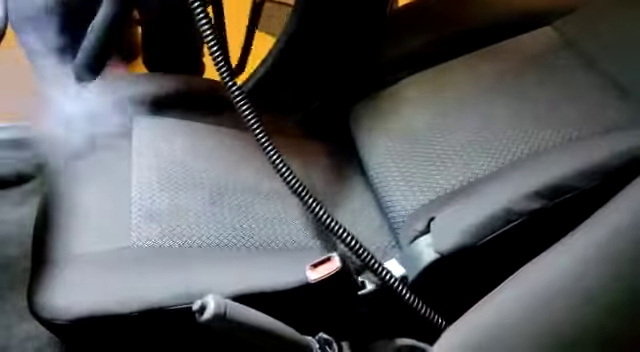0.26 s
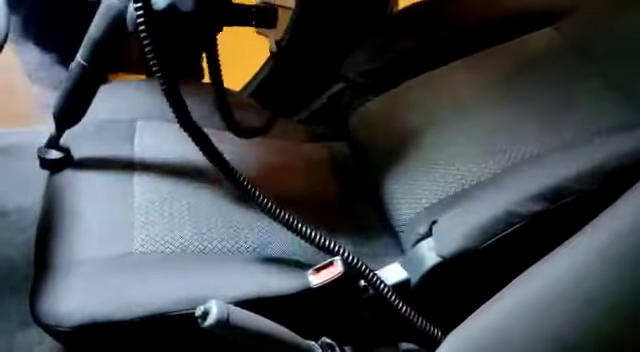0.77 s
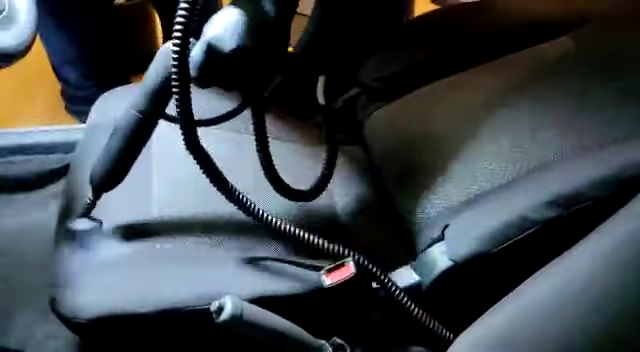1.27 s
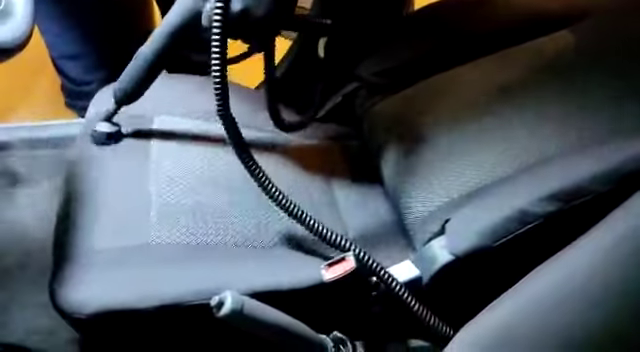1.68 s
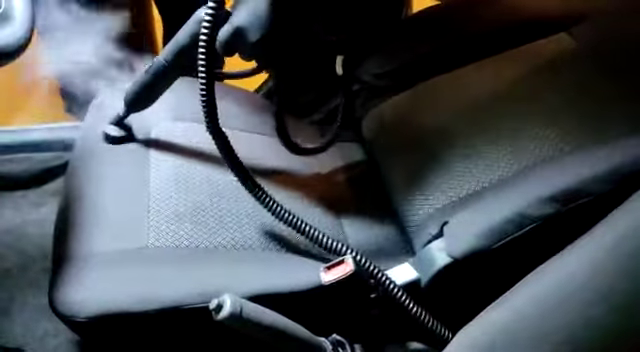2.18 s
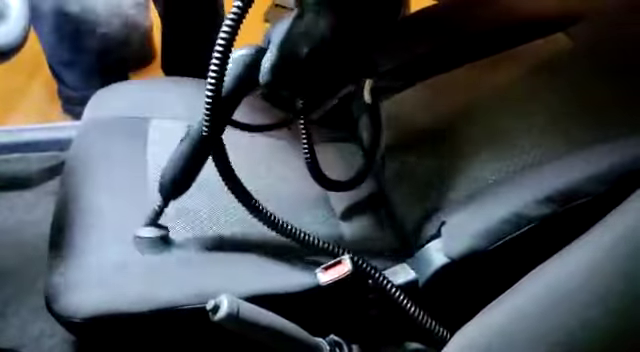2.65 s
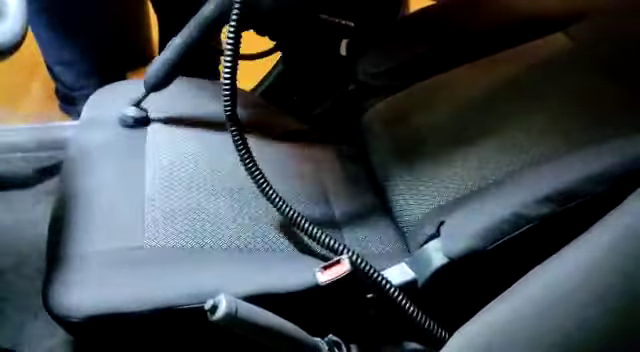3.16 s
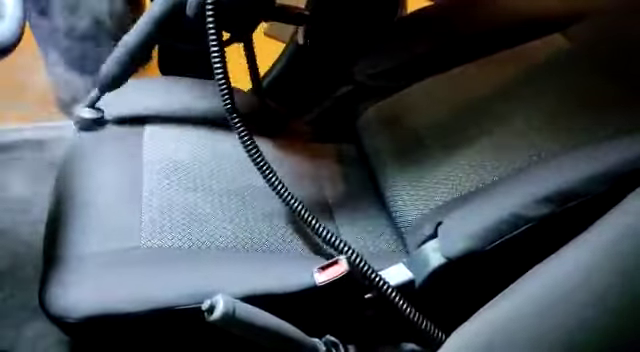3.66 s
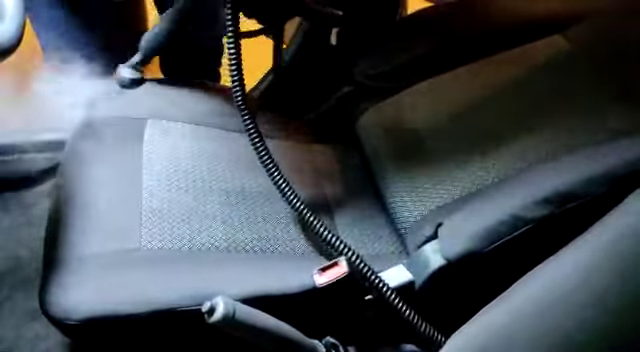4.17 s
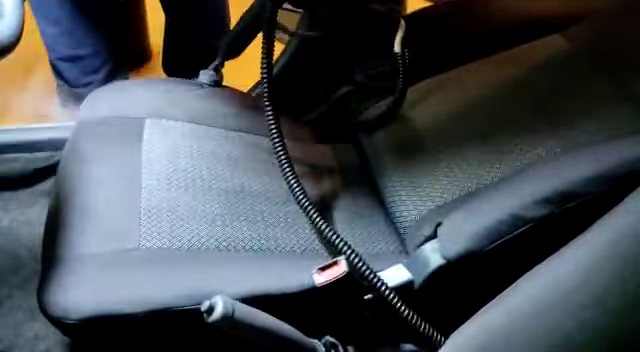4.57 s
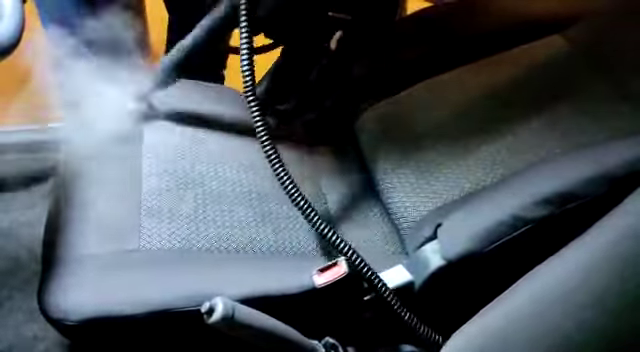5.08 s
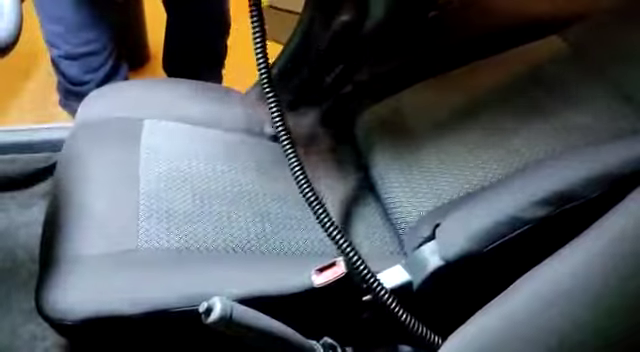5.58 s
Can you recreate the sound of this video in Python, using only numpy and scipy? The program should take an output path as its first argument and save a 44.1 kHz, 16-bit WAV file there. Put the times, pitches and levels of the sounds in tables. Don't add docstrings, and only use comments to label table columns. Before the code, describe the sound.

Steady, sizzling steam with a sharp high resonance, slightly different in pitch at left and right, fluctuates as the wand sweeps a seat. Irregular wind rumble and soft, blunt thuds overload the close phone microphone, heavier on the left. A very faint motor hum wavers beneath. Late on, one strong puff strikes the right, then the wand lifts and the hiss opens out.

```python
import sys
import numpy as np
from scipy import signal
from scipy.fft import rfft, irfft, next_fast_len
from scipy.io import wavfile
from scipy.ndimage import uniform_filter1d

SR = 44100
rng = np.random.default_rng(int(sys.argv[2]) if len(sys.argv) > 2 else 0)


def transcribe(u):
    v = np.clip(np.atleast_2d(u).T, -1, 1)
    q = np.round(v * 32767).astype(np.int16)
    wavfile.write(sys.argv[1], SR, q)


def to_linear_factor(level_db):
    exponent = np.asarray(level_db, float) / 20
    return 10 ** exponent


N = 257544


def unit_rms(x):
    return x / np.sqrt(np.mean(x ** 2))


def walk(rate_hz):
    hold = int(SR / rate_hz)
    steps = np.repeat(rng.standard_normal(N // hold + 1), hold)
    slewed = uniform_filter1d(uniform_filter1d(steps, hold), hold)
    return unit_rms(slewed[:N])


def butter(x, hz, kind, order):
    return signal.sosfilt(signal.butter(order, hz, kind, fs=SR, output="sos"), x)


# start_s, flow_db, aim_left_over_right_db, lift_db
WAND_SWEEP = [(0.0, 1.5, 4.5, 1.5), (0.15, 0.5, 1, 3.5), (0.6, -0.5, 2.5, 1), (1.05, 0, 4.5, 1.5),
              (1.41, 2.5, 3.5, 0), (1.9, 0, 2.5, 1), (2.2, -1, 1, 3), (2.6, 1, 5.5, 0), (2.85, 1.5, 4, 0),
              (3.4, 1.5, 1, 2.5), (3.8, 3, 2, 2), (4.1, -1, 2.5, 1.5), (4.5, -1, 1.5, 2),
              (4.83, 1.5, -2, 3.5), (5.06, -0.5, 4, 1), (5.4, 0, 0.5, 4.5), (5.7, -3, -3, 10),
              (5.84, 0.5, -2, 6.5)]
# centre_s, dip_left_db, dip_right_db, half_length_s
NOZZLE_DIPS = [(0.043, 1, 1.5, 0.024), (0.422, 3, 2, 0.077), (0.79, 1, 1.5, 0.07), (0.92, 2, -1, 0.21),
               (1.227, 3.5, -0.5, 0.055), (1.62, 5, 0.5, 0.13), (1.815, 3, 2, 0.045),
               (2.047, 1.5, 1.5, 0.045), (2.31, 4.5, 0.5, 0.055), (2.438, 4.5, -0.5, 0.056),
               (2.7, 2, 2, 0.031), (2.927, 4.5, 0, 0.071), (3.14, 3.5, 3.5, 0.14), (3.31, 2, 0, 0.046),
               (3.65, 5, 4, 0.12), (3.892, 7, 5, 0.028), (4.274, 1, 1, 0.027), (4.385, -0.5, 1.5, 0.051),
               (4.573, 0, 2, .025), (4.681, 5.5, 4, 0.08), (4.944, 4.5, 2.5, 0.043), (5.27, 5, 3, 0.077),
               (5.352, 4.5, -2, 0.032), (5.512, 1.5, 9, 0.087), (5.68, 1.5, 1, 0.035),
               (5.84, 4.5, 5, 0.038)]


def wand():
    t_s = np.arange(N) / SR
    start_s, *columns = np.transpose(WAND_SWEEP)
    flow_db, aim_db, lift_db = [np.interp(t_s, start_s, column) for column in columns]
    dip_l_db, dip_r_db = np.zeros((2, N))
    for centre_s, left_db, right_db, half_s in NOZZLE_DIPS:
        shape = np.exp(-((t_s - centre_s) / half_s) ** 2)
        dip_l_db += left_db * shape
        dip_r_db += right_db * shape
    ring_db = (flow_db + aim_db / 2 - dip_l_db, flow_db - aim_db / 2 - dip_r_db)
    hiss_db = (flow_db + lift_db - 1.1 * dip_l_db, flow_db + lift_db - 1.3 * dip_r_db)
    return ring_db, hiss_db


# corner_hz, left_db, right_db
PORT_COLOURS = [(278, -89, -92), (636, -73.5, -77.5), (1485, -72, -71.5), (2320, -64, -67.5),
                (2860, -60, -62), (3420, -62.5, -65), (5000, -58, -59.5), (6180, -59, -55.5),
                (7160, -54.5, -50), (7660, -51.5, -43.5), (8420, -49, -46.5), (8930, -44, -72),
                (9466, -55, -54), (10010, -63.5, -65.5), (15300, -69, -66.5)]
SHARED_PATHS = [(13, .4), (94, .42)]


def jet():
    ring_hz, air_hz, lowest_hz = 6000, 10300, 320
    ring_db, hiss_db = wand()
    both_db = ring_db[0] + ring_db[1]
    size = next_fast_len(N)
    hz = np.arange(1, size // 2 + 2) * SR / size
    corner_hz, *colours = np.transpose(PORT_COLOURS)
    wrap = np.arange(size) % N
    right = rng.standard_normal(size) * to_linear_factor(0.9 * walk(400)[wrap])
    left = rng.standard_normal(size) * to_linear_factor(0.9 * walk(400)[wrap])
    left = left + sum(share * np.roll(right, lag) for lag, share in SHARED_PATHS)
    out = []
    for noise, colour_db, ring, hiss in zip((left, right), colours, ring_db, hiss_db):
        colour = to_linear_factor(np.interp(np.log(hz), np.log(corner_hz), colour_db))
        spectrum = rfft(unit_rms(noise)) * colour * np.sqrt(SR / 2)
        air = 0.55 * (both_db - both_db.mean()) + 0.47 * (ring - ring.mean())
        port, near = 0, walk(3.5)
        for step in range(18):
            octave_thirds = 3 * np.log2(hz / lowest_hz) - step
            centre_hz = lowest_hz * 2 ** (step / 3)
            if centre_hz < ring_hz:
                drive_db = hiss - hiss.mean()
            elif centre_hz < air_hz:
                drive_db = ring - ring.mean()
            else:
                drive_db = air
            near = 0.5 * near + 0.85 * walk(11)
            window = np.cos(np.clip(octave_thirds, -1, 1) * np.pi / 2) ** 2
            band = irfft(spectrum * window, size)[:N]
            port = port + band * to_linear_factor(drive_db + 0.6 * near)
        out.append(port)
    return np.array(out)


def puffs(table, calm_db):
    fade_db = 19
    t_s, power = np.arange(N) / SR, to_linear_factor(calm_db) ** 2
    for peak_s, peak_db, rise_s, fall_s in table:
        distance = np.maximum((peak_s - t_s) / rise_s, (t_s - peak_s) / fall_s)
        power = power + to_linear_factor(peak_db - fade_db * distance) ** 2
    return 10 * np.log10(power)


def buffet(gusts, flaps, calm_db):
    cavity_hz, cavity_width_hz, edge_floor_db = 188, 131, -46
    buffet_db = puffs(gusts, calm_db)
    edge_db = np.maximum(puffs(flaps, -70), 0.12 * buffet_db - 39)
    flutter = to_linear_factor(4.5 * walk(50))
    flutter_rms = np.sqrt(uniform_filter1d(flutter ** 2, size=4000))
    eddies = rng.standard_normal(N) * flutter / flutter_rms

    band_hz = [cavity_hz - cavity_width_hz / 2, cavity_hz + cavity_width_hz / 2]
    cavity = unit_rms(butter(eddies, band_hz, "bandpass", order=1))
    cavity = unit_rms(butter(cavity, 314, "lowpass", order=3))
    cavity = unit_rms(butter(cavity, 104, "highpass", order=1))

    small = unit_rms(butter(eddies * to_linear_factor(1.5 * walk(25)), [240, 450], "bandpass", order=1))
    small = unit_rms(butter(small, 472, "lowpass", order=3))
    spit = unit_rms(butter(eddies * to_linear_factor(3.9 * walk(30)), [430, 850], "bandpass", order=2))
    small = small + to_linear_factor(-15) * spit

    rumble = butter(rng.standard_normal(N), 49, "lowpass", order=1)
    rumble = unit_rms(butter(rumble, 12, "highpass", order=1))
    rumble = butter(rumble, 203, "lowpass", order=2)
    rumble_db = 0.52 * buffet_db - 15.5 + 2.2 * walk(6.7)

    edge = butter(eddies, 260, "highpass", order=2)
    edge = unit_rms(butter(edge, 1000, "lowpass", order=2))
    edge_gain = np.sqrt(np.maximum(to_linear_factor(edge_db) ** 2 - to_linear_factor(edge_floor_db) ** 2, 0))
    return (cavity * to_linear_factor(buffet_db - 2.5) + small * to_linear_factor(1.49 * buffet_db - 1.5)
            + rumble * to_linear_factor(rumble_db) + edge * edge_gain * to_linear_factor(-5.5))


# peak_s, peak_db, rise_s, fall_s
GUSTS_LEFT = [(0.08, -13.5, 0.062, 0.23), (0.26, -16, 0.028, 0.1), (0.36, -16, 0.06, .12),
              (0.7, -12, 0.14, 0.093), (0.86, -11, 0.079, .1), (1.06, -12.5, 0.059, .18),
              (1.28, -13.5, 0.12, 0.15), (1.42, -12, 0.024, 0.17), (1.55, -7, 0.068, 0.089),
              (1.77, -11.5, 0.047, 0.019), (1.99, -18, 0.031, 0.092), (2.08, -12.5, 0.13, 0.1),
              (2.25, -10, .1, 0.036), (2.37, -13, 0.15, 0.12), (2.58, -22.5, .07, 0.073),
              (2.87, -11.5, 0.19, 0.096), (3.08, -20, 0.037, 0.031), (3.18, -9, 0.017, 0.03),
              (3.33, -9, 0.052, 0.07), (3.54, -19, .3, 0.065), (3.72, -19.5, 0.062, 0.12),
              (3.98, -14.5, 0.076, 0.027), (4.25, -20, 0.45, .06), (4.71, -12, 0.089, 0.14),
              (4.93, -11.5, 0.065, .12), (5.18, -15, 0.049, 0.032), (5.27, -7.5, 0.018, 0.047),
              (5.51, -12.5, 0.32, 0.12), (5.7, -28, .2, 0.21)]
GUSTS_RIGHT = [(0.1, -35, .3, .3), (0.24, -27, 0.13, 0.24), (0.36, -21.5, 0.22, 0.043),
               (0.49, -20.5, 0.043, 0.078), (0.72, -34, 0.18, .3), (0.9, -20, 0.17, 0.15),
               (1.2, -16.5, 0.063, 0.045), (1.39, -22, .25, 0.065), (1.58, -20, 0.15, 0.14),
               (1.75, -24, 0.059, 0.079), (1.91, -25, 0.054, 0.027), (2.13, -17, 0.062, 0.037),
               (2.23, -27, 0.12, 0.35), (2.49, -17.5, 0.12, 0.036), (2.63, -28, .045, 0.13),
               (2.78, -46, .1, .08), (2.91, -16, .09, 0.091), (3.13, -26, 0.059, 0.035),
               (3.29, -40, 0.06, .2), (3.4, -34, 0.13, .1), (3.48, -27, 0.067, 0.099),
               (3.63, -30, 0.21, 0.035), (3.86, -22.5, .08, .05), (4.02, -35, 0.22, 0.078),
               (4.63, -21, 0.12, 0.11), (4.96, -20, .08, 0.13), (5.1, -19, .12, 0.12),
               (5.45, -6, 0.04, 0.03), (5.59, -26, 0.093, 0.32)]
# peak_s, peak_db, rise_s, fall_s
EDGE_FLAPS_LEFT = [(0.08, -20, .06, .06), (0.14, -28, .05, .05), (0.36, -38, .07, .2), (0.7, -40, .08, .08),
                   (0.86, -27, 0.062, 0.044), (1.56, -24, .06, 0.079), (2.08, -24, 0.053, 0.055),
                   (2.3, -35, .15, .15), (4.93, -42, .06, .06), (0.55, -34, .2, 0.28),
                   (1.06, -25, 0.055, 0.51), (1.28, -21.5, 0.061, 0.33), (1.42, -15.5, 0.032, 0.095),
                   (1.93, -35, 0.32, .15), (2.77, -21, .03, .3), (2.87, -19, .2, .05),
                   (3.33, -29, .08, 0.077), (3.98, -30.5, 0.12, 0.2), (4.57, -31, 0.3, .5),
                   (5.5, -26.5, 0.12, 0.11), (5.84, -32, .5, .1)]
EDGE_FLAPS_RIGHT = [(0.23, -32, .6, .12), (0.49, -34, 0.1, .2), (1.14, -32, .2, .25),
                    (1.39, -25, .16, 0.14), (2.91, -21.5, 0.12, 0.11), (3.4, -36, .12, .06),
                    (3.8, -33.5, .08, 0.45), (4.48, -37, .1, 0.21), (4.8, -35, .3, 0.44),
                    (5.31, -35, .3, .1), (5.45, -24, 0.026, 0.034), (5.84, -36, 0.96, .1)]


def wind():
    left = buffet(GUSTS_LEFT, EDGE_FLAPS_LEFT, calm_db=-42)
    right = buffet(GUSTS_RIGHT, EDGE_FLAPS_RIGHT, calm_db=-44.5)
    return np.array([left, right])


def motor():
    hum_hz = 530 * (1 + 0.00183 * walk(3.16) + 0.00803 * walk(25))
    phase = np.cumsum(hum_hz) * 2 * np.pi / SR
    port_db = np.array([[-2.5], [0.6]])
    return np.sin(phase) * to_linear_factor(-52 + 2.0 * walk(4.25) + port_db)


# start_s, peak_db, ring_hz
STRIKES_LEFT = [(0.073, -8.5, 199), (0.361, -18, 192), (0.604, -18, 227), (0.641, -19.5, 377),
                (0.7, -13, 235), (0.896, -13.5, 273), (1.055, -9.5, 242), (1.228, -29, 177),
                (1.274, -37, 233), (1.413, -11, 265), (1.499, -24, 254), (1.566, -18, 308),
                (1.628, -12.5, 221), (1.977, -13, 183), (2.052, -14.5, 170), (2.252, -10.5, 237),
                (2.343, -12, 210), (2.763, -17.5, 315), (2.846, -12, 443), (3.176, -23, 190),
                (3.317, -10, 260), (3.369, -18.5, 218), (3.454, -19, 294), (3.919, -20.5, 160),
                (4.764, -15, 211), (4.827, -15, 273), (4.903, -13.5, 285), (5.263, -14, 248),
                (5.496, -17, 242), (5.553, -20, 185)]
STRIKES_RIGHT = [
    (0.469, -22, 244),
    (0.96, -24, 232),
    (4.96, -17, 208),
    (5.068, -17, 262),
    (5.442, -10.5, 230),
]


def thumps():
    crack_db, crack_s = -21, 0.0022
    out, t_s = np.zeros((2, N + 4000)), np.arange(4000) / SR
    for port, table in enumerate((STRIKES_LEFT, STRIKES_RIGHT)):
        for start_s, peak_db, ring_hz in table:
            envelope = np.exp(-t_s / 0.0069) * (1 - np.exp(-t_s / 0.0004))
            ring = np.sin(2 * np.pi * ring_hz * t_s) * envelope
            rag = unit_rms(butter(rng.standard_normal(len(t_s)), [330, 750], "bandpass", order=1))
            crack = rag * (t_s / crack_s) * np.exp(-t_s / crack_s / 2.08)
            strike = ring + to_linear_factor(crack_db) * crack
            start = int(start_s * SR)
            out[port, start:start + len(t_s)] += strike * to_linear_factor(peak_db + 7.0)
    return out[:, :N]


def scene():
    return jet() + wind() + thumps() + motor()


def roll_off(x):
    return signal.sosfilt(signal.butter(12, 16570, fs=SR, output="sos"), x)


def record(dry):
    rounded = np.tanh(1.25 * dry) / 1.25
    return roll_off(rounded)


dry = scene()
out = record(dry)
transcribe(out)
```